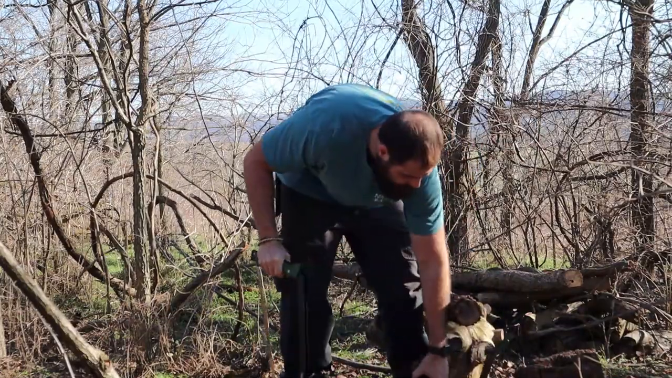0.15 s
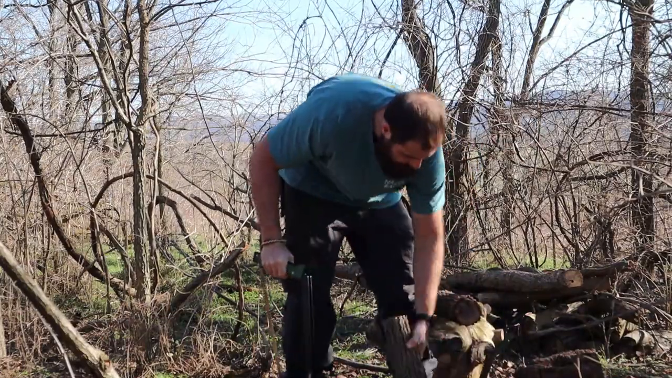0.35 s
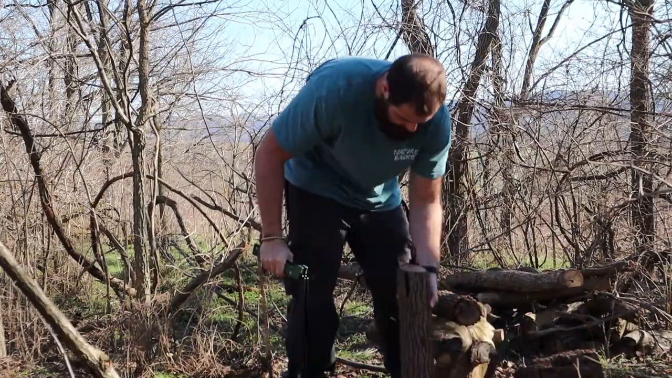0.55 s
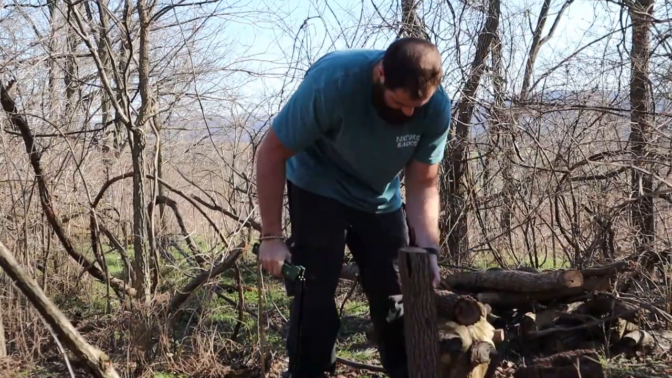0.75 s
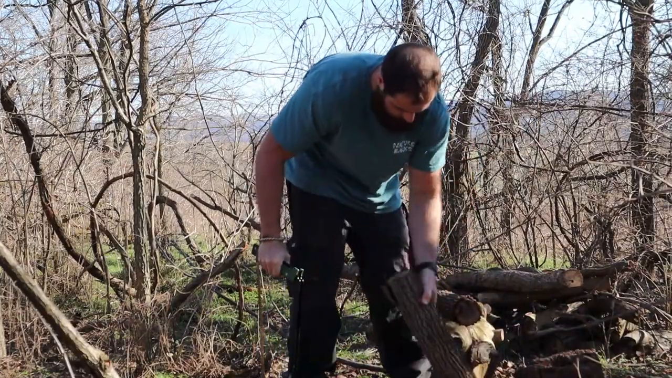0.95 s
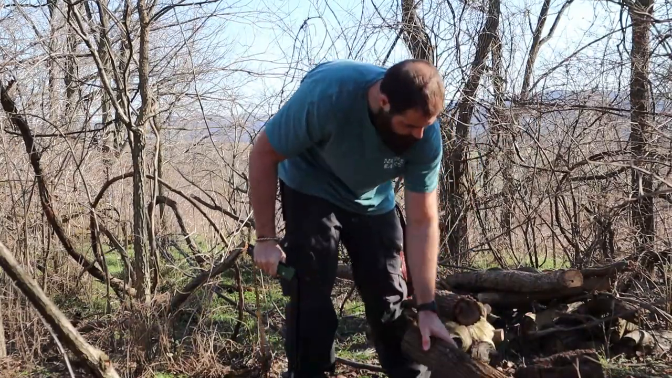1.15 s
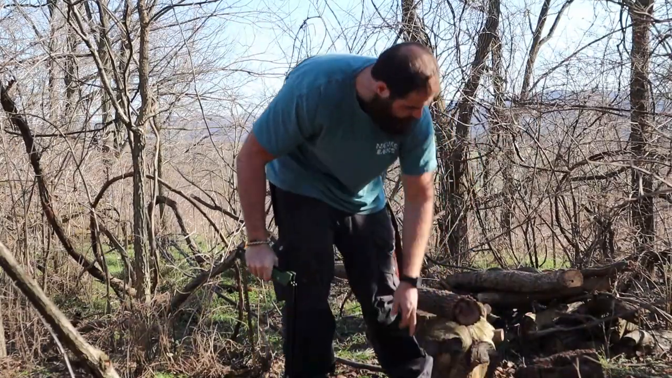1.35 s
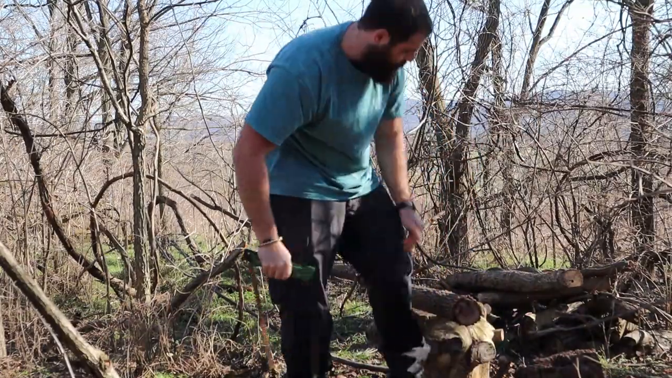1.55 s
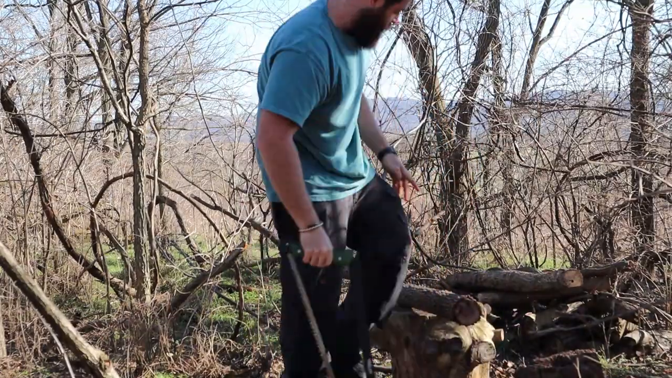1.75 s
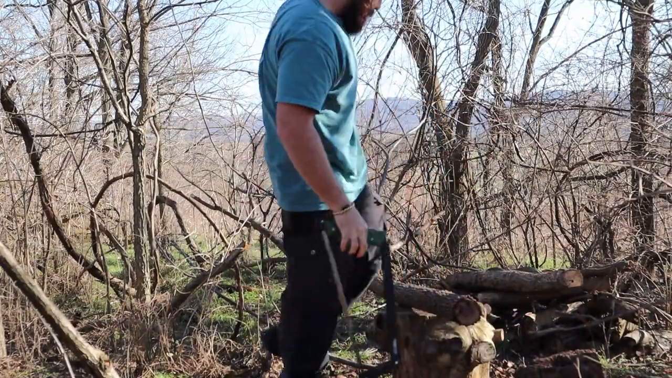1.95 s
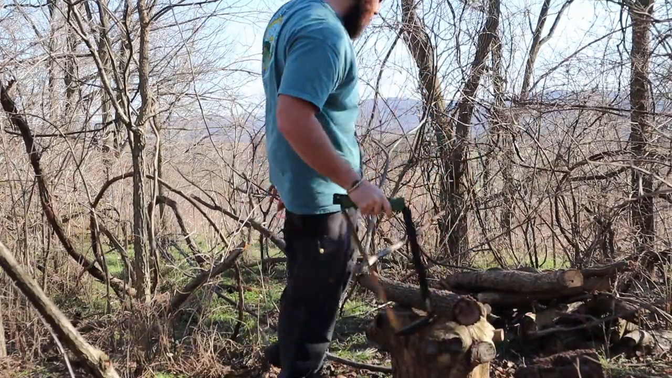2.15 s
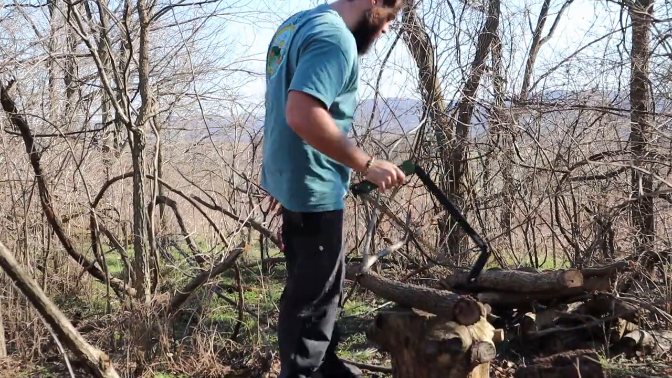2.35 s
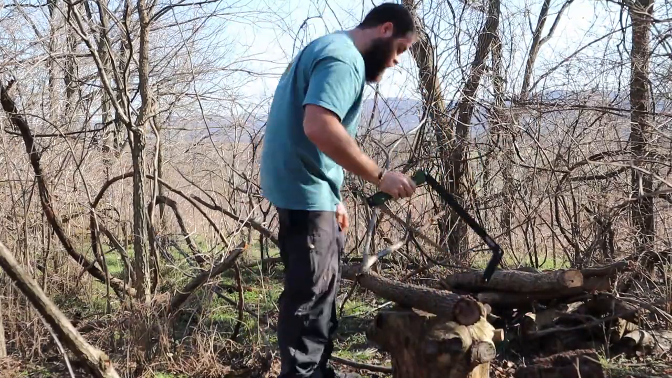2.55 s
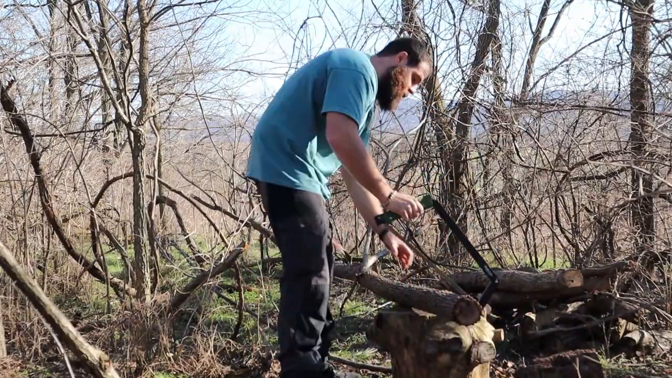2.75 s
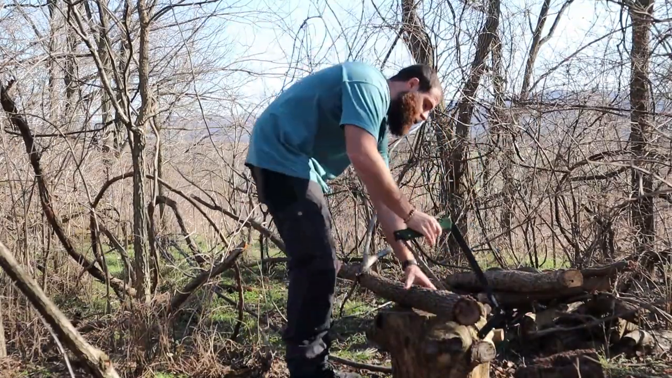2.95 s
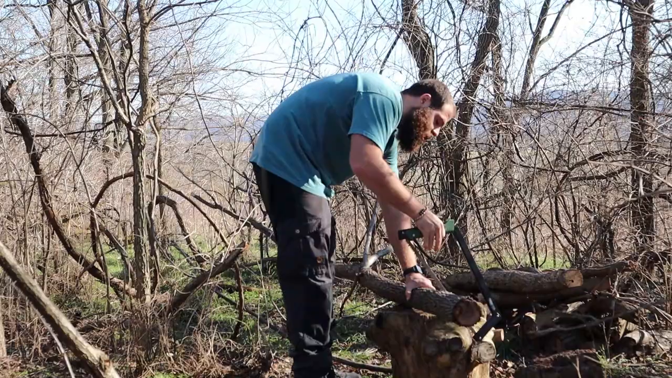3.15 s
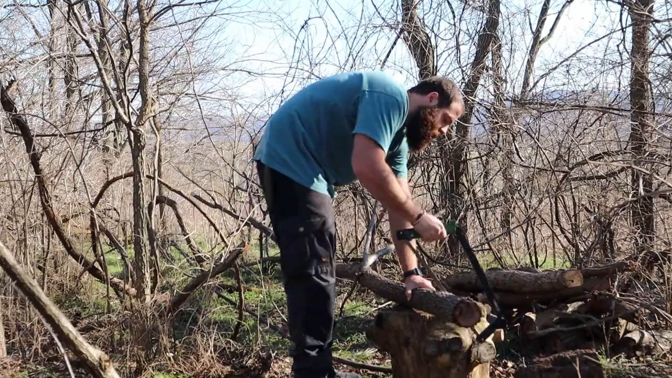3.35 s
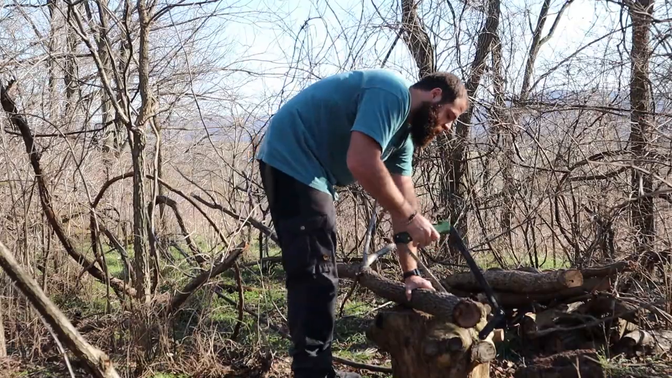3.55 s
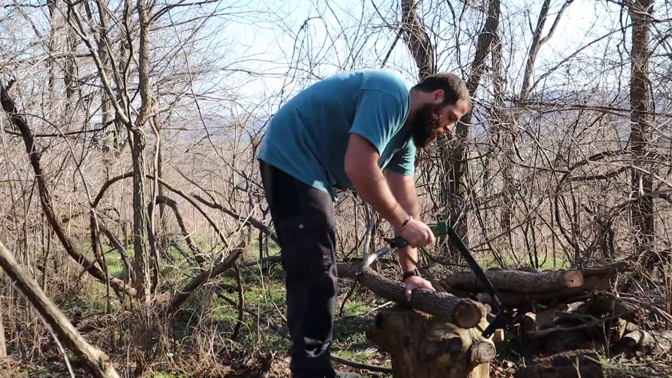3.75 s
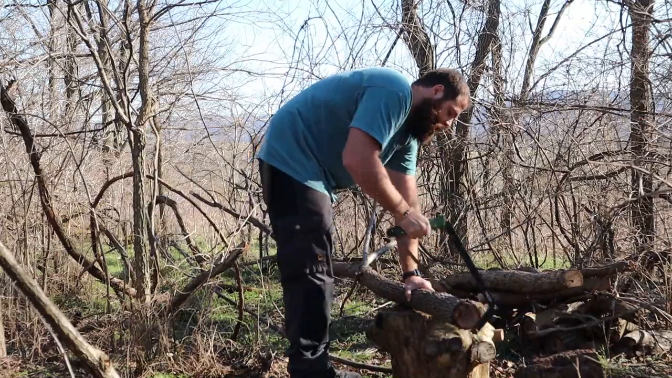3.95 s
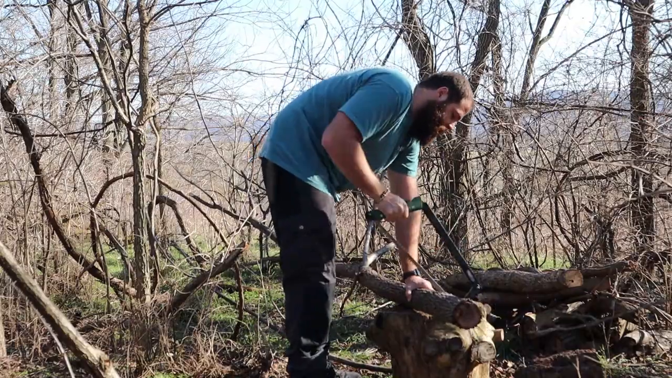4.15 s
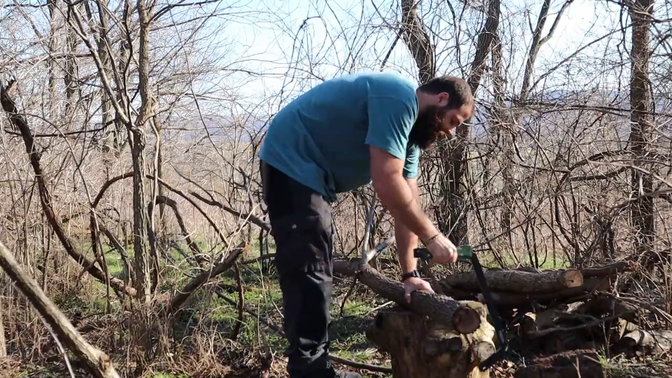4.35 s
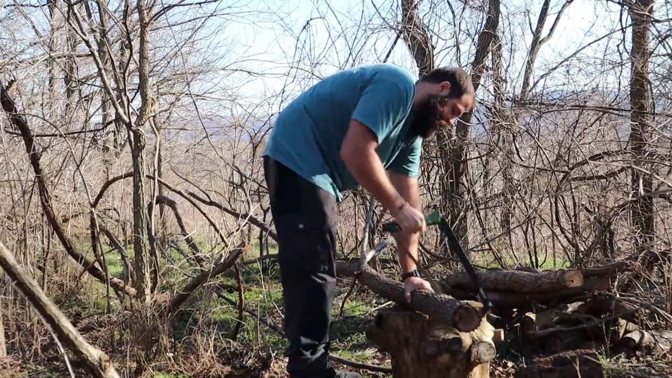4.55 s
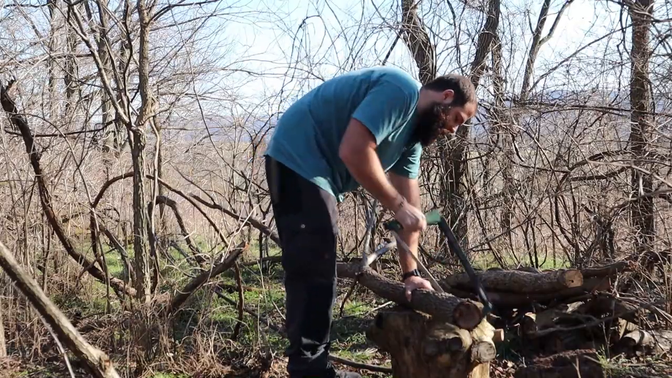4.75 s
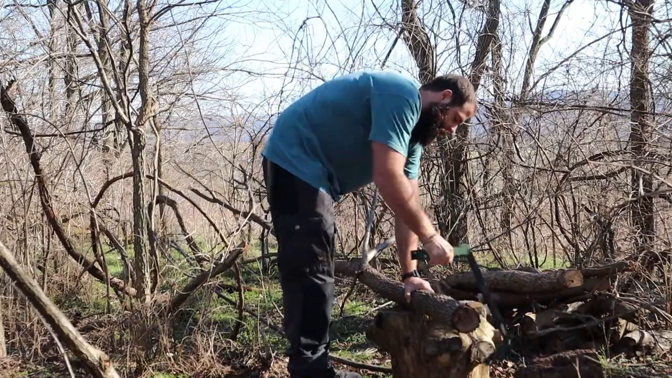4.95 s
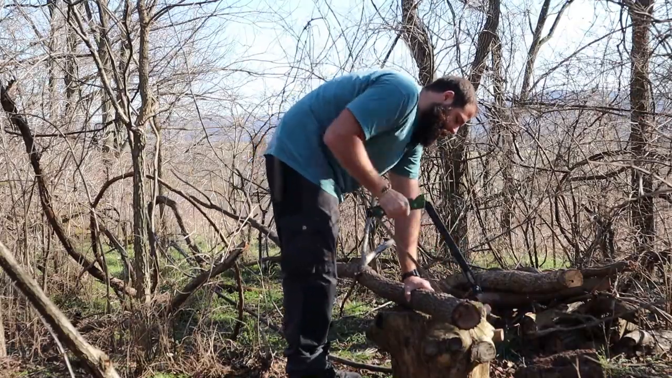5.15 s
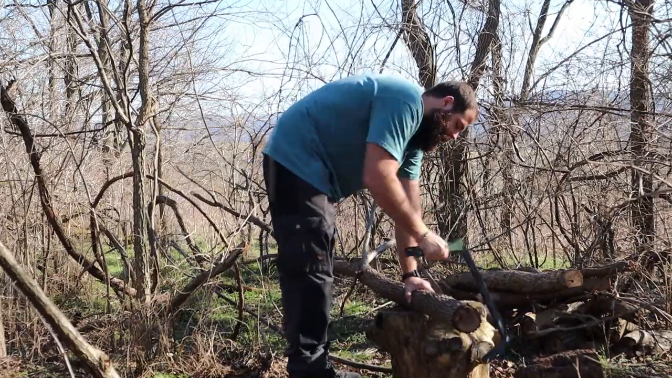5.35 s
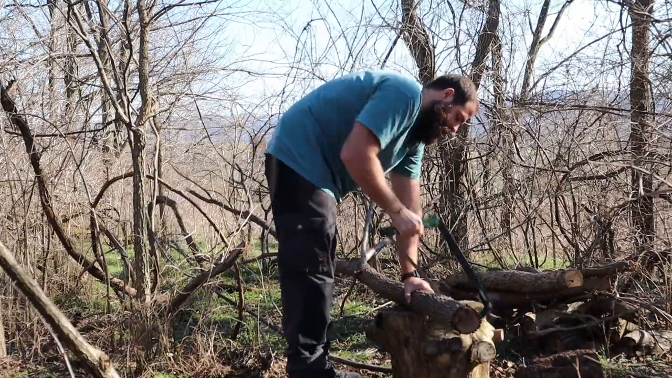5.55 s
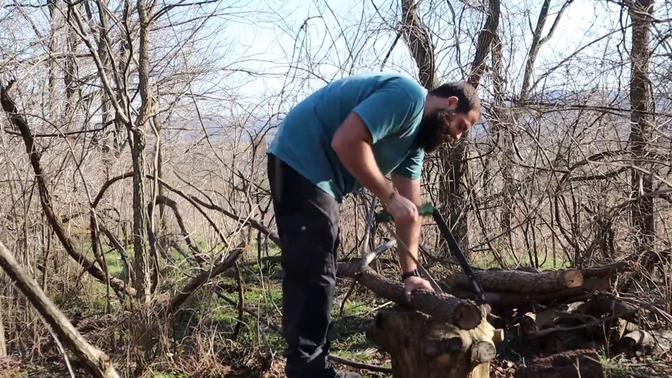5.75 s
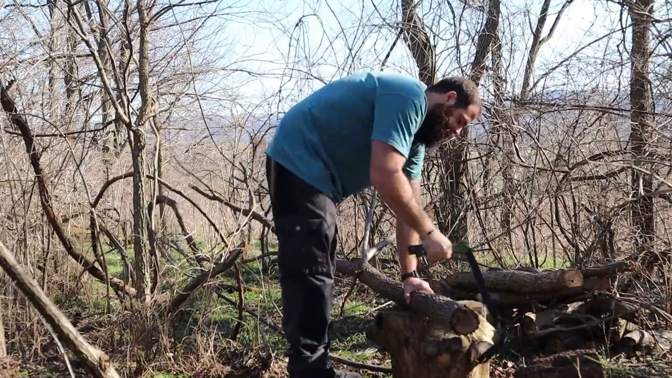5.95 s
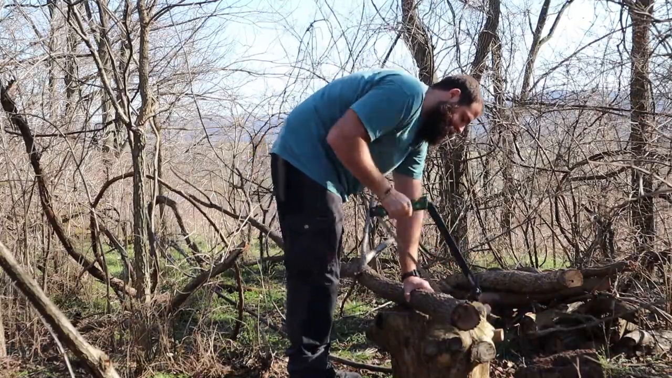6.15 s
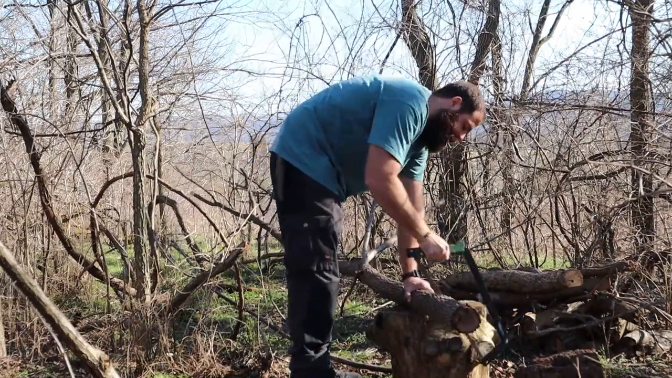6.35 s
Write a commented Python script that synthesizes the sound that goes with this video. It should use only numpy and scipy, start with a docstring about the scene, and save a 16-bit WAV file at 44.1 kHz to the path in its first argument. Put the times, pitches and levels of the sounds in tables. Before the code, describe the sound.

Wood knocks and thuds on leafy ground, a bow saw clatters onto bark, then ten raspy back-and-forth strokes cut a log outdoors.

```python
"""At the edge of a wood a man drops a billet on the leafy ground and knocks a log against the stump:
wood modes ring after a crack, dull thuds sound on the ground, leaves rustle under his boots, twigs snap.
He sets a bow saw on the bark with hollow clacks and short scrapes that ring the frame.
He then saws in ten strokes: fibres tear, teeth snag and judder, the log sounds and the taut blade rings on
at each turn. Far-off air lies under it all, and a light wind brushes the microphone in puffs."""
import sys
import numpy as np
from scipy import signal
from scipy.fft import rfft, irfft
from scipy.io import wavfile
from scipy.ndimage import map_coordinates

SR = 44100
rng = np.random.default_rng(int(sys.argv[2]) if len(sys.argv) > 2 else 0)


def log_audio(samples):
    """Write samples as a 16-bit WAV file to the path given in sys.argv[1]."""
    # one column per channel
    frames = np.atleast_2d(samples).T
    # limit to full scale, then quantise
    limited = np.clip(frames, -1, 1)
    pcm = np.round(limited * 32767).astype(np.int16)
    wavfile.write(sys.argv[1], SR, pcm)


N = 286209

# All levels in the tables are relative to their layer.
# Saw strokes, pull and push in turn: (start [s], hardest at [s], rasp effort at the turn [dB],
# rasp effort at its hardest [dB], log effort at its hardest [dB], top tooth rate [1/s], tooth growl [dB])
STROKES = [(4.05, 4.128, -61, -43, -54.5, 263, -21), (4.279, 4.43, -66, -34.5, -48.5, 222, 5.5),
           (4.57, 4.681, -69.5, -38.5, -52, 228, -6.5), (4.823, 4.953, -56.5, -33.5, -46, 305, -2.5),
           (5.070, 5.195, -69, -37, -52.5, 257, -8), (5.339, 5.467, -59.5, -32.5, -48.5, 312, -10),
           (5.593, 5.683, -64, -35.5, -54.5, 280, 0), (5.83, 5.961, -63, -32, -45.5, 345, 1),
           (6.085, 6.179, -76, -41.5, -53.5, 248, -10), (6.333, 6.455, -68, -33, -47.5, 333, -5)]
# Teeth snag and break free: (time [s], change of grip [dB], half length [s])
SNAGS = [(4.103, 4.5, 0.012), (4.2, 3, .015), (4.409, 1.5, 0.0026), (4.445, 4.5, 0.0053),
         (4.762, -5, 0.0017), (4.923, 3.5, 0.0026), (5.097, 9.5, .002), (5.554, 17.5, 0.0056),
         (5.728, 5.5, 0.0041), (5.87, 4, .0043), (5.964, 6, .005), (6.111, 8.5, .0037), (6.153, 8, 0.0058),
         (6.179, 5.5, 0.0061), (6.209, 9, 0.0046), (6.347, 9.5, 0.0043), (6.388, 7, 0.0041)]
# Rasp in the kerf: (frequency [Hz], density [dB])
RASP_SPECTRUM = [(500, -31.5), (1000, -14.5), (1260, -6), (1520, -13), (1800, -8.5), (2200, -6.5),
                 (3050, -3.5), (3620, -3.5), (3820, -11), (5700, -10.5), (6300, -18.5), (7200, -24),
                 (14500, -27.5), (15700, -35)]
# Body of the log: (frequency [Hz], density [dB])
LOG_SPECTRUM = [(100, -31), (170, -25.5), (215, 1.5), (260, -3.5), (340, -6.5), (450, -3), (600, -4),
                (740, 3), (1000, -4), (1500, -7), (3000, -34)]
# Log resounding on the stump: (frequency [Hz], width [Hz], level [dB])
LOG_MODES = [(220.4, 17, -6.5), (392.5, 7.8, 0.5)]
# Blade and frame: (frequency [Hz], width [Hz], level [dB])
BLADE_MODES = [(1925, 8, 7.3), (2024, 9, 7), (2089, 16, 8.5), (2442, 22, 4.5), (2888, 24, 3.5),
               (3112, 22, 4), (3336, 25, 6), (5680, 14, -6), (11950, 7, -13), (13760, 7, -15),
               (2220, 50, -1), (2605, 45, 3), (2770, 40, -2), (3270, 40, 2), (3470, 60, 0), (3633, 40, 3),
               (3993, 25, -7), (4400, 55, -3), (4690, 50, -2), (5350, 50, -6), (5435, 25, -6),
               (5900, 9, -3), (6300, 40, -13), (6690, 45, -16), (11300, 70, -22), (13620, 90, -18),
               (14300, 90, -22)]
# Wood on wood: (time [s], level [dB], crack over blow [dB])
KNOCKS = [(.2535, -50.5, 14.5), (.519, -56, -1), (1.4812, -32.5, 6), (1.4865, -47, -14), (1.569, -55, -12),
          (1.5935, -47, 3), (1.9007, -41, -14), (1.903, -23, -14), (1.9069, -31, 2), (2.537, -59.5, 15)]
# Struck wood: (frequency [Hz], level [dB], t60 [s])
WOOD_MODES = [(520, -38, 0.059), (686, -20, 0.042), (918, -1, 0.063), (1084, -3, 0.015),
              (1390, -5.5, 0.018), (1545, -12, 0.024), (2020, -35, 0.016), (2600, -18.5, 0.02),
              (3290, -12.5, 0.019), (3930, -19, 0.033), (4860, -27, 0.029)]
# Crushed bark: (frequency [Hz], density [dB])
CRACK_SPECTRUM = [(300, -8), (900, 2), (1800, -5.5), (2800, -4.5), (3600, 1.5), (4200, -13), (6000, -10.5),
                  (7500, -15), (12000, -20.5), (15500, -33)]
# Dull blows on the ground: (time [s], level [dB], frequency [Hz], t60 [s])
THUDS = [(0.508, -46.5, 268, 0.025), (0.634, -50, 110, 0.09), (1.478, -33.5, 100, 0.088),
         (1.483, -41, 267, 0.097), (1.484, -38, 414, 0.032), (1.4938, -29, 99, 0.08),
         (1.503, -48, 92.3, 0.21), (1.621, -49.5, 99, 0.097), (2.537, -39.5, 333, 0.0089)]
# Blade touches the bark: (time [s], level [dB], scrape time constant [s], clack pitch [Hz], clack t60 [s])
TOUCHES = [(3.0105, -43.5, 0.0017, 890, 0.059), (3.022, -41, 0.0035, 885, 0.042),
           (3.042, -53, 0.003, 690, 0.05), (3.056, -52.5, 0.0081, 902, 0.22),
           (3.064, -52, .008, 680, 0.091), (3.0775, -39, 0.005, 860, 0.013),
           (3.082, -49, 0.0029, 614, 0.11), (3.112, -57, 0.0096, 890, .02),
           (3.147, -53.5, 0.0049, 940, 0.014)]
# Bright ring of the frame: (frequency [Hz], width [Hz], level [dB])
FRAME_MODES = [(1980, 79, -13), (2640, 40, -12.5), (3440, 110, -2), (12300, 1400, -22)]
# Boots and logs stir the leaves: (time [s], level [dB], rise [s], fall [s], crispness [dB])
RUSTLES = [(0.038, -60, 0.11, 0.058, 3.5), (.24, -62, 0.061, 0.081, 6.5), (.44, -66.5, 0.12, 0.087, 4),
           (.516, -53, 0.022, 0.031, 3.5), (.638, -63, 0.053, 0.042, 0.5), (1.345, -70.5, 0.039, .06, 12.5),
           (1.467, -45, 0.0083, 0.056, 1.5), (1.61, -55.5, .06, .1, -3), (1.86, -67.5, .2, 0.26, -3),
           (2.19, -73.5, .07, 0.12, -1), (2.6, -60.5, 0.12, 0.41, -5), (2.88, -60.5, 0.074, 0.14, -1),
           (3.13, -56.5, 0.12, 0.15, -2), (3.6, -71.5, 0.24, .15, -3), (3.94, -67.5, 0.27, 0.069, -12)]
# Dry leaves: (frequency [Hz], density [dB])
LEAF_SPECTRUM = [(180, -46), (300, -11.5), (411, -9.5), (744, -8), (907, 0), (1280, -11.5), (1840, -7.5),
                 (2480, -10.5), (3450, -7.5), (4070, -15.5), (5390, -11), (7880, -24), (12300, -21),
                 (15500, -30)]
# Twigs snap: (time [s], level [dB])
TWIGS = [(0.0329, -38), (0.0834, -54), (0.196, -48), (0.301, -48), (0.38, -47), (0.5325, -41),
         (1.1742, -54), (1.2126, -54), (1.278, -48), (1.509, -36), (1.609, -43), (1.719, -50.5),
         (1.9145, -46), (1.934, -47), (1.969, -51), (2.395, -53), (2.5692, -42), (3.1946, -58),
         (3.233, -47), (3.3941, -47), (3.634, -53), (3.8773, -54)]
# Snapping twig: (frequency [Hz], density [dB])
TWIG_SPECTRUM = [(400, -24), (1000, -12), (2200, -5), (3500, 4.5), (4200, 0.5), (5700, 4.5), (7500, -5.5),
                 (12000, -9.5), (15500, -10)]
# Puffs of wind on the microphone: (time [s], level [dB], rise [s], fall [s])
PUFFS = [(.07, -58, .03, 0.03), (3.2, -61, .04, 0.057), (3.34, -64.5, .07, .07), (5.3, -56.5, 0.064, 0.059),
         (5.66, -65, .1, 0.049), (6.28, -51.5, 0.088, .06), (6.4, -47, .04, .18)]
# Wind: (frequency [Hz], density [dB])
WIND_SPECTRUM = [(15, 0), (35, -6), (70, -4), (120, -19), (300, -46)]
# Far-off air: (frequency [Hz], density [dB])
AIR_SPECTRUM = [(18, -49), (30, 1.5), (140, -2.5), (341, -4.5), (410, -5.5), (575, -7.5), (709, -7),
                (970, -4.5), (1050, -13), (1230, -12.5), (2300, -19.5), (3400, -19), (6210, -25),
                (15500, -29)]

LAST_TURN_S, LAST_TURN_DB = 6.58, -70
# Exponents of (rise, fall), pull then push: a pull bites at once, a push builds and stops short
RASP_SQUARENESS = [(3.1, 3.16), (2.03, 2.53)]
LOG_SQUARENESS = [(3, 3), (1.7, 2.1)]
LOG_SWING_DB = 25   # fall of the log effort at each turn
REST_S = (0.005, 0.024)   # blade has run out this long before the turn, (pull, push)
JUDDER_LIMIT_DB = 5.26
# Chatter as one pull runs out
CHATTER_START_S, CHATTER_END_S, CHATTER_PER_S, CHATTER_DB = 4.70, 4.84, 57, 3
CRISP_HZ = 6000   # crispness lifts the leaves above this
# A swell is this far down one rise before and one fall after its peak
SWELL_DEPTH_DB, SWELL_SQUARENESS = 10, 1.04
AIR_DB = -66
CUTOFF_HZ = 15700


def saw():
    """Teeth bite and tear; the same uneven grip drives kerf, blade and log."""
    bites, passed, place = tooth_motion(jitter=.04, cycle_scatter_db=2.5)
    grip = tooth_grip()
    rasp_effort, log_effort = arm_effort()

    force = rasp_effort * grip * (tearing(passed) + from_db(-17.0) * bites)
    kerf = from_db(-4.5) * colour(splinters(force, depth=0.43, per_s=65), RASP_SPECTRUM)
    # light contact is duller than a deep cut
    dull = low_pass(kerf, hz=4000)
    kerf = dull + (kerf - dull) * (rasp_effort / from_db(-37.5)) ** 0.2

    blade_force = rasp_effort * grip * tearing(passed)
    blade = from_db(6.5) * blade_ring(blade_force, place, node_depth=0.77, sag_s=0.000096)

    shove = log_effort * np.sqrt(grip) * (0.73 * tearing(passed) + 0.78 * bites)
    log = from_db(-1.5) * colour(shove, LOG_SPECTRUM) + from_db(12.0) * resonate(shove, LOG_MODES)
    return kerf + blade + log


def tooth_motion(jitter, cycle_scatter_db):
    """The blade speeds up and slows in each stroke; gives tooth clicks, teeth passed, place on blade (0-1)."""
    t = seconds()
    rate_per_s, place, growl_db = np.zeros((3, N))
    for k, ((start_s, *_, teeth_per_s, tooth_db), (end_s, _)) in enumerate(zip(STROKES, turns())):
        on = (t >= start_s) & (t < end_s)
        angle = np.pi * (t[on] - start_s) / (end_s - start_s)
        rate_per_s[on] = teeth_per_s * np.abs(np.sin(angle)) ** .4
        place[on] = (1 + (-1) ** k * np.cos(angle)) / 2
        growl_db[on] = tooth_db
    passed = np.cumsum(rate_per_s * (1 + jitter * drift(150))) / SR
    bite_db = growl_db + cycle_scatter_db * rng.standard_normal(N)
    bites = np.diff(np.floor(passed), prepend=0) * from_db(bite_db)
    return bites * np.sqrt(SR / np.mean(rate_per_s[rate_per_s > 0])), passed, place


def turns():
    """Where each stroke ends and the blade turns round: (time [s], rasp effort [dB])."""
    inner = [(start_s, turn_db) for start_s, _, turn_db, *_ in STROKES[1:]]
    return inner + [(LAST_TURN_S, LAST_TURN_DB)]


def arm_effort():
    """Effort swells from one turn to the hardest point and fades to the next; gives gains of rasp and log."""
    t = seconds()
    rasp, log = np.zeros((2, N))
    for k, (stroke, (end_s, end_db)) in enumerate(zip(STROKES, turns())):
        start_s, hardest_s, turn_db, rasp_db, log_db, _, _ = stroke
        on = (t >= start_s) & (t < end_s)
        rising = t[on] < hardest_s
        slack = np.interp(t[on], [start_s, hardest_s, end_s - REST_S[k % 2]], [1, 0, 1])
        swing_db = rasp_db - np.where(rising, turn_db, end_db)
        rasp_power = np.where(rising, *RASP_SQUARENESS[k % 2])
        log_power = np.where(rising, *LOG_SQUARENESS[k % 2])
        rasp[on] = from_db(rasp_db - swing_db * slack ** rasp_power)
        log[on] = from_db(log_db - LOG_SWING_DB * slack ** log_power)
    return rasp, log


def tooth_grip():
    """Gain of random stick and slip, of snags and of chatter."""
    t = seconds()
    snag_db = sum(db * np.exp(-np.minimum(((t - s) / half_s) ** 2, 20)) for s, db, half_s in SNAGS)
    judder_db = JUDDER_LIMIT_DB * np.tanh((0.48 * drift(190) + 0.39 * drift(55)) / 2)
    return from_db(judder_db + snag_db + chatter_db())


def chatter_db():
    """A short run of nearly regular jerks in the grip."""
    t = seconds()
    jerks = np.cumsum(CHATTER_PER_S * (1 + 0.122 * drift(40))) / SR
    on = (t >= CHATTER_START_S) * (t < CHATTER_END_S)
    return CHATTER_DB * on * np.cos(2 * np.pi * jerks)


def tearing(passed):
    """Fibres break in a dense spray, hardest just after each tooth bites."""
    return grains(per_s=13000, spread_db=2.4) * (.55 + 1.2 * np.exp(-(passed % 1) / .38))


def splinters(x, depth, per_s):
    """Chips of every size come and go, so narrow bands swell and sink on their own."""
    bands_hz = np.geomspace(1100, 7000, num=16)
    return x + depth * sum(resonate(x, [(hz, hz / 10, 0)]) * drift(per_s) for hz in bands_hz)


def blade_ring(force, place, node_depth, sag_s):
    """Each mode is driven less as its nodes slide through the kerf; changing tension bends the pitch."""
    out = np.zeros(N)
    for hz, width_hz, db in BLADE_MODES:
        nodes = np.sqrt(hz / 450)   # bending waves shorten with the root of frequency
        drive = 1 + node_depth * np.cos(2 * np.pi * (nodes * place + rng.random()))
        out += resonate(force * drive, [(hz, width_hz, db)]) * rng.choice([-1, 1])
    return map_coordinates(out, [np.arange(N) + sag_s * SR * drift(9)], order=3)


def knocks():
    """Wood rings briefly with a crack of crushed bark; dull thuds on the ground sound at their own times."""
    blows = low_cut(clicks([(s, db) for s, db, _ in KNOCKS]), hz=334)
    wood = low_cut(sum(from_db(db) * ring(blows, hz, t60_s) for hz, db, t60_s in WOOD_MODES), hz=496)
    crush = bursts([(s, db + crack_db, .003) for s, db, crack_db in KNOCKS])
    crack = from_db(-7.5) * colour(crush, CRACK_SPECTRUM)
    ground = low_cut(sum(ring(clicks([(s, db)]), hz, t60_s) for s, db, hz, t60_s in THUDS), hz=55)
    return wood + crack + ground


def blade_set_down():
    """Teeth skip over the bark: each touch is a hollow clack and a short scrape that rings the frame."""
    scrape = bursts([(s, db, tau_s) for s, db, tau_s, _, _ in TOUCHES])
    clack = sum(ring(clicks([(s, db)]), hz, t60_s) for s, db, _, hz, t60_s in TOUCHES)
    clack = from_db(7.0) * low_cut(clack, hz=396)
    frame = from_db(20.0) * resonate(scrape, FRAME_MODES)
    return clack + frame + from_db(-5.0) * colour(scrape, CRACK_SPECTRUM)


def leaf_litter():
    """Leaves crackle over a soft swish, the driest with more treble; now and then a twig snaps."""
    crackle = 0.74 * grains(per_s=1300, spread_db=3.5) + 0.78 * rng.standard_normal(N)
    crackle = crackle * from_db(2.8 * drift(70))
    body = low_pass(crackle, CRISP_HZ)
    body_gain = swells([(s, db, rise_s, fall_s) for s, db, rise_s, fall_s, _ in RUSTLES])
    crisp_gain = swells([(s, db + crisp_db, rise_s, fall_s) for s, db, rise_s, fall_s, crisp_db in RUSTLES])
    leaves = body_gain * body + crisp_gain * (crackle - body)
    twigs = from_db(-5.5) * bursts([(s, db, .0012) for s, db in TWIGS])
    return colour(leaves, LEAF_SPECTRUM) + colour(twigs, TWIG_SPECTRUM)


def woodland(x, t60_s, echo_db):
    """Trunks scatter a faint, dull tail."""
    t = np.arange(SR // 2) / SR
    tail = rng.standard_normal(len(t)) * np.exp(-np.log(1000) * t / t60_s) * (t > .006)
    tail = low_pass(tail, hz=5000)
    return x + from_db(echo_db) * signal.fftconvolve(x, tail / np.linalg.norm(tail))[:N]


def wind():
    """Puffs brush the microphone as low-pitched noise."""
    return swells(PUFFS) * colour(rng.standard_normal(N), WIND_SPECTRUM)


def far_air():
    """Steady coloured noise of far-off air."""
    return from_db(AIR_DB) * low_cut(colour(rng.standard_normal(N), AIR_SPECTRUM), hz=44.6)


def from_db(db):
    """Decibels to gain."""
    return 10 ** (np.asarray(db) / 20)


def rms_one(x):
    """Scale to unit rms."""
    return x / np.sqrt(np.mean(x ** 2) + 1e-20)


def seconds():
    """Time of every sample."""
    return np.arange(N) / SR


def drift(per_s):
    """Smooth random curve of unit rms through per_s knots a second."""
    knots = rng.standard_normal(N)
    return rms_one(map_coordinates(knots[:int(N / SR * per_s) + 4], [seconds() * per_s], order=2))


def clicks(rows):
    """One click for each (time [s], level [dB])."""
    out = np.zeros(N)
    for s, db in rows:
        out[round(s * SR)] += from_db(db)
    return out


def bursts(rows):
    """A dying puff of noise for each (time [s], level [dB], time constant [s])."""
    t = seconds()
    gain = sum(from_db(db) * (t >= s) * np.exp(-np.clip((t - s) / tau_s, 0, 20)) for s, db, tau_s in rows)
    return rng.standard_normal(N) * gain


def grains(per_s, spread_db):
    """Random fractures, many small and a few large; rms 1."""
    sizes = from_db(spread_db * np.minimum(rng.exponential(1, N), 4)) * rng.choice([-1, 1], N)
    return rms_one(sizes * (rng.random(N) < per_s / SR))


def swells(rows):
    """Gain of overlapping swells (time [s], level [dB], rise [s], fall [s]); their powers add."""
    t, power = seconds(), np.zeros(N)
    for s, db, rise_s, fall_s in rows:
        away = np.maximum((s - t) / rise_s, (t - s) / fall_s)
        near = away < 5
        power[near] += from_db(db - SWELL_DEPTH_DB * away[near] ** SWELL_SQUARENESS) ** 2
    return np.sqrt(power)


def colour(x, spectrum):
    """Causal minimum-phase filter of the given shape that keeps the power of white noise."""
    size = 2 ** 13
    hz, db = np.transpose(spectrum)
    grid_hz = np.maximum(np.fft.rfftfreq(size, 1 / SR), 1)
    gain = rms_one(from_db(np.interp(np.log(grid_hz), np.log(hz), db)))
    cepstrum = irfft(np.log(gain))
    # fold onto positive times
    cepstrum[1:size // 2] *= 2
    cepstrum[size // 2 + 1:] = 0
    return signal.fftconvolve(x, irfft(np.exp(rfft(cepstrum))))[:N]


def resonate(x, modes):
    """Parallel two-pole resonances (frequency [Hz], width [Hz], level at the top [dB])."""
    out = np.zeros(N)
    for hz, width_hz, db in modes:
        r = np.exp(-np.pi * width_hz / SR)
        poles = [1, -2 * r * np.cos(2 * np.pi * hz / SR), r * r]
        out += from_db(db) * (1 - r * r) / 2 * signal.lfilter([1, 0, -1], poles, x + 1e-18)
    return out


def ring(x, hz, t60_s):
    """A unit click starts a dying sine of height 1."""
    r, w = np.exp(-np.log(1000) / (t60_s * SR)), 2 * np.pi * hz / SR
    return signal.lfilter([0, r * np.sin(w)], [1, -2 * r * np.cos(w), r * r], x + 1e-18)


def low_cut(x, hz):
    """Second-order high-pass: small bodies radiate little bass."""
    return signal.sosfilt(signal.butter(2, hz, "high", fs=SR, output="sos"), x)


def low_pass(x, hz):
    """First-order treble roll-off."""
    return signal.lfilter(*signal.butter(1, hz, fs=SR), x)


def scene():
    """Work at the stump, over far-off air and wind."""
    work = woodland(saw() + knocks() + blade_set_down() + leaf_litter(), t60_s=0.31, echo_db=-24)
    return (work + wind() + far_air())[None]


def record(dry):
    """A twelfth-order elliptic low-pass cuts the top steeply."""
    return signal.sosfilt(signal.ellip(12, .2, 80, CUTOFF_HZ, fs=SR, output="sos"), dry)


dry = scene()
out = record(dry)
log_audio(out)
```